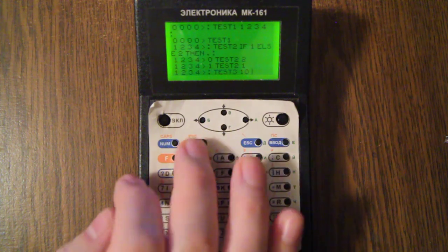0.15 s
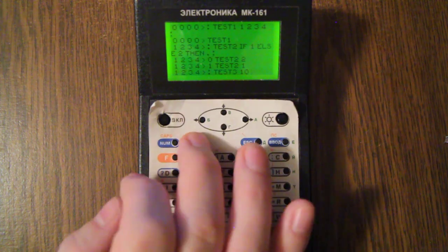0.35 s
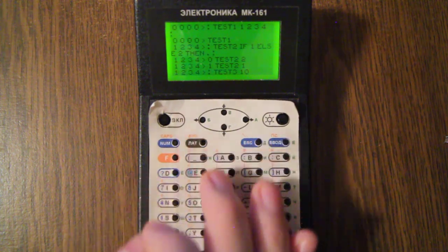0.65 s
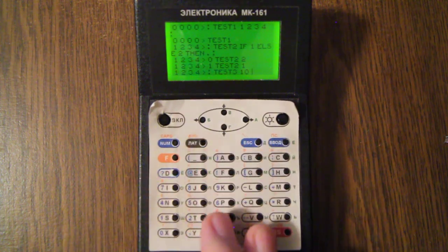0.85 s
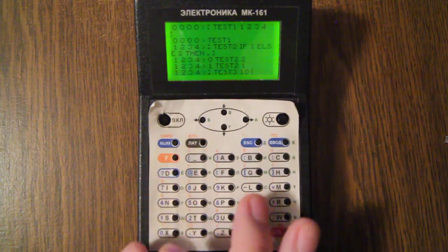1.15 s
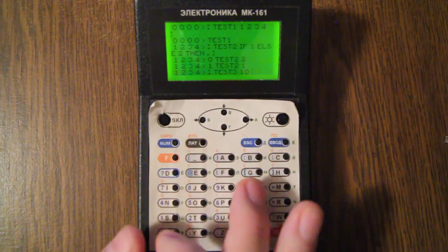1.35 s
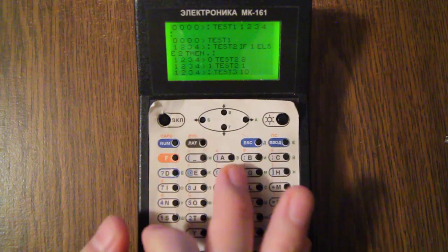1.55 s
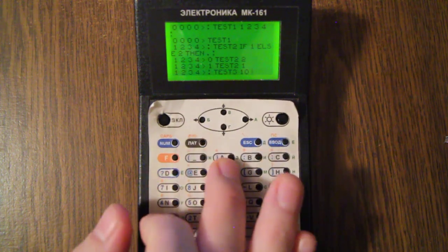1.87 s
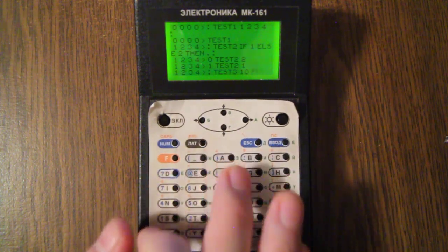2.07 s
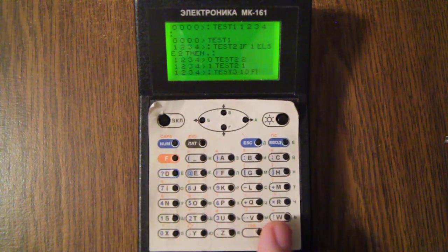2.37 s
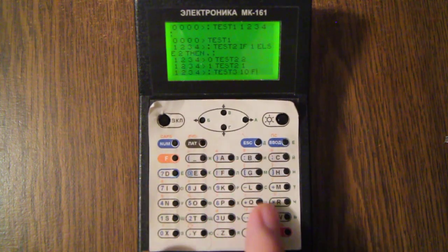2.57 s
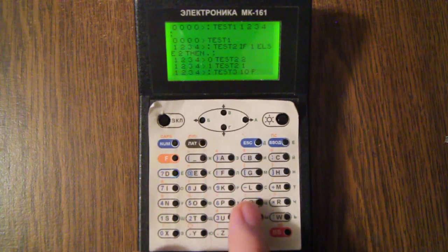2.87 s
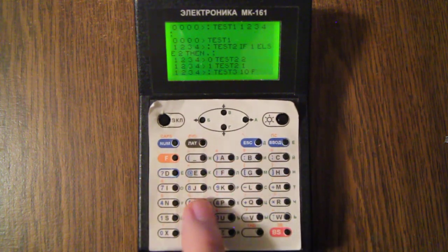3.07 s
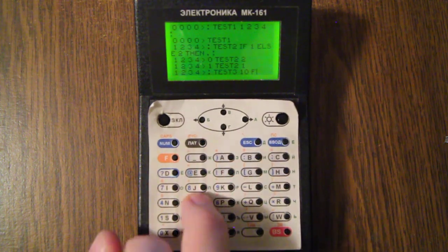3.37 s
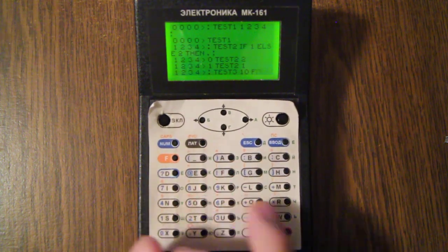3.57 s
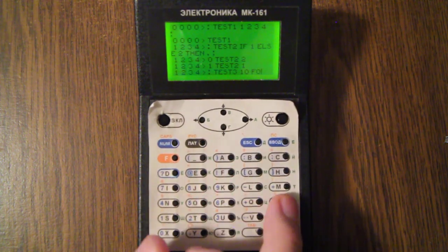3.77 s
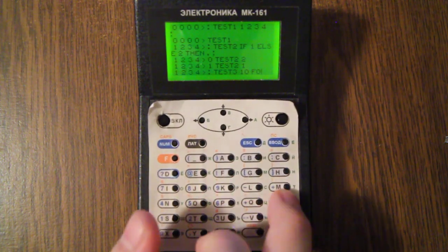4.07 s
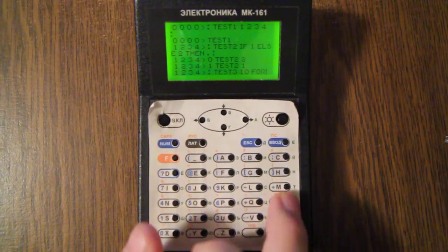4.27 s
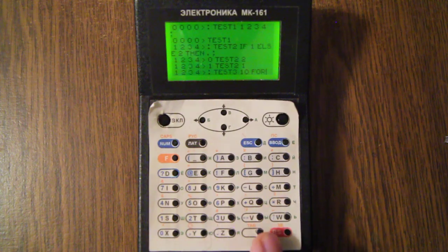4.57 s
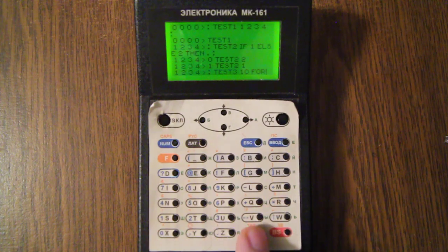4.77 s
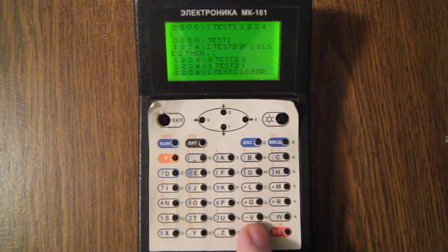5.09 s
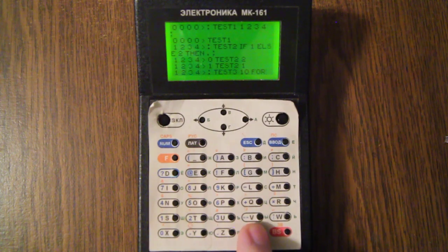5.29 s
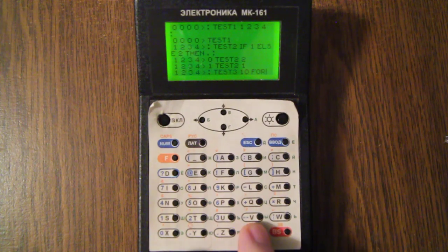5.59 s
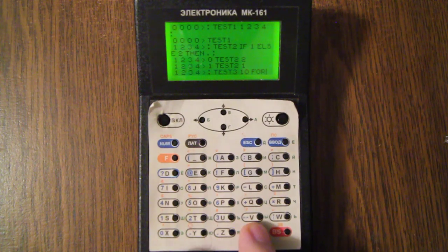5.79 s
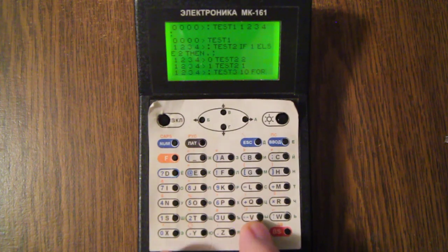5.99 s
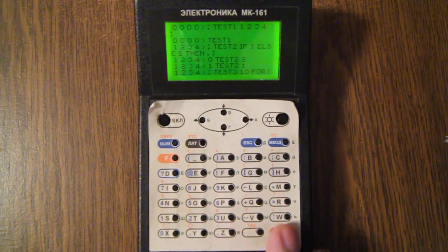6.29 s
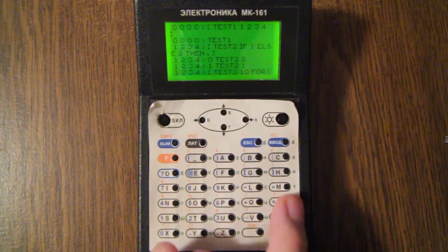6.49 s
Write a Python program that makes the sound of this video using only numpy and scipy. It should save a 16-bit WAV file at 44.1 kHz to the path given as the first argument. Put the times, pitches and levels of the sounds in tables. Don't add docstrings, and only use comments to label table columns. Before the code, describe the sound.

A finger presses small stiff keys on a hollow plastic calculator lying on a wooden desk. Sharp snaps with boxy knocks are followed by looser release rattles, three main press-release pairs early on, then a loud single press, softer taps, a lull and a light final cluster. A small fan whirrs steadily behind, with low rumble and hiss. Close microphone, small room with a brief response.

```python
import sys
import numpy as np
from scipy import signal
from scipy.fft import rfft, irfft
from scipy.io import wavfile

SR = 44100
rng = np.random.default_rng(int(sys.argv[2]) if len(sys.argv) > 2 else 0)


def voltage_ratio(decibels):
    exponent = np.asarray(decibels, float) / 20
    return 10 ** exponent


def to_wav(s):
    ch = np.atleast_2d(s).T
    pcm = np.round(np.clip(ch, -1, 1) * 32767)
    wavfile.write(sys.argv[1], SR, pcm.astype(np.int16))


N = 292824


def level(x, db):
    return x * voltage_ratio(db) / np.sqrt(np.mean(x ** 2))


def shaped(gain, count):
    hz = np.arange(count // 2 + 1) * SR / count + 1
    return irfft(rfft(rng.standard_normal(count)) * gain(hz), count)


def slope(points):
    hz, db = np.transpose(points)
    return lambda f: voltage_ratio(np.interp(np.log(f), np.log(hz), db))


def walk(rate_hz):
    wander = shaped(lambda f: 1 / (1 + (f / rate_hz) ** 2), N)
    return wander / wander.std()


def add(out, start_s, y):
    i = int(start_s * SR)
    out[i:i + len(y)] += y[:N - i]


def background():
    # pitch_hz [Hz], density_db [dB per Hz]
    hiss_curve = [(25, -41), (45, -4.5), (65, -2.5), (120, -2), (300, -8), (600, -10.5), (1000, -15),
                  (2000, -19.5), (4000, -18.5), (8000, -24.5), (12000, -29.5), (16000, -35.5)]
    # start_s [s], hold_s [s], level_db [dB]
    swells = [
        (0.0, 0.4, -52.5),
        (1.95, 0.38, -55),
        (3.35, 1.0, -47.5),
        (6.087, .4, -53.5),
    ]
    rise_db_s, fall_db_s = 73, 46
    hiss = level(shaped(slope(hiss_curve), N), -57.5)
    drone = level(shaped(lambda f: 1 / (1 + ((f - 225) / 35) ** 2), N), -11.5)
    t = np.arange(N) / SR
    swell = np.zeros(N)
    for start_s, hold_s, db in swells:
        early_s = np.maximum(start_s - t, 0)
        late_s = np.maximum(t - start_s - hold_s, 0)
        swell += voltage_ratio(db - rise_db_s * early_s - fall_db_s * late_s)
    return hiss + drone * swell


def fan():
    # pitch_hz [Hz], width_hz [Hz], level_db [dB]
    housing = [(754, 256, -8.5), (771, 47, -9), (1319, 435, -8), (1457, 360, 2), (1573, 217, -4.5),
               (1656, 220, -6), (2455, 610, -17.5), (3473, 510, -18.5)]
    # pitch_hz [Hz], wander_hz [Hz], level_db [dB]
    motor_tones = [(48, 1.55, -65), (201, 3.1, -76.5), (301.5, 3.05, -70.5), (770, 1.35, -62.5),
                   (1201, 2.48, -65.5), (1371, 4.04, -59.5), (1793, 3, -72)]
    flutter_db, gust_db, tone_sway_db = -1, 2.5, 2
    air, tones = np.zeros(N), np.zeros(N)
    for hz, width_hz, db in housing:
        band = shaped(lambda f: 1 / (1 + (2 * (f - hz) / width_hz) ** 2) ** 1.58, N)
        air += voltage_ratio(db + flutter_db * walk(1.6)) * band
    for hz, wander_hz, db in motor_tones:
        cycles = np.cumsum(hz + wander_hz * walk(3.94)) / SR
        tones += voltage_ratio(db + tone_sway_db * walk(2.2)) * np.sin(2 * np.pi * cycles)
    return level(air * voltage_ratio(gust_db * walk(68)), -49) + tones


def brushes():
    # middle_s [s], level_db [dB], length_ms [ms], pitch_hz [Hz]
    rubs = [
        (.87, -68, 30, 5500),
        (5.459, -65, 22, 3000),
        (6.30, -64.5, 32, 9700),
        (6.305, -68, 23, 14000),
    ]
    out, count = np.zeros(N), 4096
    ms = np.linspace(-0.5, 0.5, count) * count / SR * 1000
    for middle_s, db, length_ms, hz in rubs:
        rub = shaped(lambda f: 1 / (1 + ((f - hz) / (0.17 * hz)) ** 2), count)
        add(out, middle_s - count / 2 / SR, level(rub, db) * np.exp(-(ms / length_ms) ** 2))
    return out


def room(x):
    # pitch_hz [Hz], level_db [dB]
    reflections = [(200, 0.5), (700, -5.5), (1500, 6), (3000, -7.5), (5000, -3), (6500, -1), (8600, 0),
                   (11000, -4), (16000, -6)]
    t60_s, gap_ms = 0.19, 5.2
    t = np.arange(8192) / SR
    build = 1 - np.exp(-(t * 1000 / gap_ms) ** 2)
    tail = shaped(slope(reflections), len(t)) * 1000. ** (-t / t60_s) * build
    return signal.fftconvolve(x, tail * voltage_ratio(-11) / np.linalg.norm(tail))


def ring(modes, push, near_hz, favour_db, scatter_db, sustain):
    hz, db, t60_s = np.transpose(modes)
    level_chance, pitch_chance = rng.standard_normal((2, len(hz)))
    nearness = np.exp(-(np.log(hz / near_hz) / 0.18) ** 2)
    db = db + scatter_db * level_chance + favour_db * nearness
    t = np.arange(int(SR * t60_s.max() * sustain))[:, None] / SR
    side = (-1.) ** np.arange(len(hz))
    waves = np.sin(2 * np.pi * hz * (1 + 0.023 * pitch_chance) * t)
    body = waves * 1000. ** (-t / (t60_s * sustain)) @ (side * voltage_ratio(db))
    y = signal.fftconvolve(body, push)
    return y / np.abs(y).max()


def knocks():
    # start_s [s], peak_db [dB], pitch_hz [Hz], desk_thump_db [dB re peak], lid_db
    # [dB re peak]
    landings = [(0.3837, -25.5, 620, -16, -10), (0.546, -22, 513, -17.5, -13), (0.573, -55, 350, -25, -4),
                (0.927, -57, 357, -10, -9), (1.802, -26.5, 715, -15.5, -1.5), (2.045, -24, 510, -23, -5.5),
                (2.073, -32, 530, -24, -6), (3.312, -30.5, 745, -12, -5), (3.453, -41, 770, -4.5, -2),
                (3.499, -29, 522, -8, -9.5), (3.519, -37, 706, -8, -6), (3.993, -31.5, 730, -16, -3),
                (4.2792, -27, 740, -15, -5.5), (4.321, -49, 713, -21, 9), (5.897, -34.5, 650, -10, -12),
                (6.137, -32, 690, -8, -8), (6.185, -44.5, 729, -16, -4)]
    # pitch_hz [Hz], level_db [dB], t60_s [s]
    case_modes = [(358.5, -5.5, 0.16), (395.6, 1, 0.05), (517, 8, 0.027), (604, 6, 0.011),
                  (593, -2.5, 0.01), (704.3, -0.5, 0.089)]
    lid_modes = [(934, -0.5, 0.04), (1034, -1.5, 0.069), (1204, 8.5, 0.042), (1620, 3, 0.027)]
    desk_modes = [(111, -6, 0.22), (143, 0.5, 0.097), (219.8, -1.5, 0.15)]
    firm_db, firm_ring, ring_per_db = -35.5, 0.9, 0.5
    out, push = np.zeros(N), np.hanning(int(0.5 * SR / 1000))
    for s, db, hz, thump_db, lid_db in landings:
        sustain = firm_ring + ring_per_db * max(firm_db - db, 0)
        case = voltage_ratio(db) * ring(case_modes, push, hz, favour_db=5.5, scatter_db=2.5, sustain=sustain)
        case = signal.lfilter([1, -1], [1, -.988], case)
        lid = voltage_ratio(db + lid_db) * ring(lid_modes, push, hz, favour_db=0, scatter_db=1, sustain=1)
        desk = voltage_ratio(db + thump_db) * ring(desk_modes, push, hz, favour_db=0, scatter_db=2.5, sustain=1)
        add(out, s, case)
        add(out, s, lid)
        add(out, s, voltage_ratio(0.5) * room(case))
        add(out, s + 0.0031, desk)
    return out


def spray(rise_ms, chatter_ms):
    ms = np.arange(SR // 40) * 1000 / SR
    shape = (1 - np.exp(-ms / rise_ms)) * np.exp(-ms / chatter_ms)
    return rng.standard_normal((3, len(ms))) * rng.random(len(ms)) ** 2.56 * shape


def even(x, order=16):
    r = np.correlate(x, x, "full")[len(x) - 1:][:order + 1]
    lags = np.abs(np.subtract.outer(np.arange(order), np.arange(order)))
    predictor = np.linalg.solve(r[lags], r[1:])
    return signal.lfilter(np.r_[1, -predictor], 1, x)


def click(out, s, db, bright_db, hz, top_db, ticks):
    # pitch_hz [Hz], level_db [dB], t60_s [s]
    panel_modes = [(1900, -6, 0.023), (2360, 4.5, 0.015), (2700, 1.5, 0.028), (3230, 7.5, 0.01),
                   (3930, 4.5, 0.013), (4270, 10.5, 0.0038), (5120, -6.5, 0.031)]
    dome_modes = [(6020, 2.5, 0.0047), (6750, -3, 0.0078), (6520, 4.5, 0.008), (8500, 0.5, 0.0054),
                  (8820, -4, 0.011)]
    edge_modes = [(9660, 2, 0.0024), (11000, -1.5, 0.0039), (12700, -0.5, 0.0022), (14700, -5.5, 0.0011)]
    soft_below_db, soft_roll_off = -8.5, 0.61
    tilt = soft_roll_off * min(bright_db - soft_below_db, 0)
    parts = (panel_modes, db), (dome_modes, db + bright_db), (edge_modes, db + top_db)
    for (part_modes, part_db), tick in zip(parts, ticks):
        modes = [(f, g + tilt * max(np.log2(f / hz), 0), t60_s) for f, g, t60_s in part_modes]
        direct = voltage_ratio(part_db) * ring(modes, even(tick), hz, favour_db=8.0, scatter_db=3.5, sustain=0.91)
        blurred = ring(modes, [1.], hz, favour_db=3.0, scatter_db=1, sustain=.45)
        blurred = blurred * np.linalg.norm(direct) / np.linalg.norm(blurred)
        add(out, s, direct)
        add(out, s, room(blurred))


def releases():
    # start_s [s], slip_after_ms [ms], rebound_after_ms [ms], landing_db [dB], growth_db [dB per stage]
    let_go = [
        (0.5468, 11, 24.5, -36.5, -0.8),
        (2.0438, 12.8, 30, -33, 5),
        (3.496, 13.4, 24.6, -38, 6),
    ]
    # bright_db [dB re peak], pitch_hz [Hz], chatter_ms [ms]
    stages = [
        (-18, 2360, 6.2),
        (-11, 3860, 3.3),
        (-11.5, 3800, 1.56),
    ]
    rattles = []
    for s, slip_ms, rebound_ms, db, growth_db in let_go:
        for k, ms in enumerate((0, slip_ms, rebound_ms)):
            rattles.append((s + ms / 1000, db + k * growth_db, *stages[k]))
    return rattles


def keys():
    # start_s [s], peak_db [dB], bright_db [dB re peak], pitch_hz [Hz], top_db [dB re peak]
    snaps = [
        (0.3829, -19, -11.5, 3060, -25),
        (1.8017, -18, 2, 3200, -23),
        (3.3098, -19.5, -0.5, 3900, -17),
        (3.9896, -16, -4.5, 4540, -15.5),
        (5.895, -28.5, -12, 3440, -11),
    ]
    # start_s [s], peak_db [dB], bright_db [dB re peak], pitch_hz [Hz], chatter_ms [ms]
    lone_rattles = [(0.1371, -48, -20, 2410, 2.5), (0.2289, -29.5, -11.5, 3340, 3.1),
                    (0.3344, -60, -13, 2570, 2.3), (2.616, -36.5, -14, 4500, 1.5),
                    (3.4545, -46, -15, 2290, 2.7), (3.7604, -38, -14, 3760, 4.1),
                    (4.2772, -26.5, -19, 2600, 5.3), (4.3141, -39, -18, 2390, 3),
                    (4.319, -42, -23, 2720, 2.3), (4.4462, -37, -6.5, 3220, 3),
                    (4.554, -53, -16, 3350, 2.3), (4.8627, -36, -27, 3220, 1.4),
                    (6.139, -37.5, -7.5, 2860, 7), (6.1616, -46, -1, 2290, 2.3),
                    (6.1734, -45, -17, 2700, 2.5), (6.1847, -37.5, -12, 3230, 1.5),
                    (6.229, -46, -11, 3230, 2.8), (6.554, -37.5, -10.5, 3870, 2.9)]
    bounce_ms, bounce_db = 1.7, -7.5
    out = np.zeros(N)
    for s, db, bright_db, hz, top_db in snaps:
        chatter_ms = 3.27 + 0.07 * bright_db
        ticks = voltage_ratio(-7.5) * spray(0.11, chatter_ms)
        ticks[:, 0] = 1
        ticks[:, int(bounce_ms * SR / 1000)] += voltage_ratio(bounce_db)
        click(out, s + .0008, db, bright_db, hz, top_db, ticks)
    for s, db, bright_db, hz, chatter_ms in sorted(list(lone_rattles) + releases()):
        edge_db = -13 + 0.49 * bright_db
        click(out, s, db, bright_db, hz, edge_db, spray(2.0, chatter_ms))
    return out


def scene():
    return (background() + fan() + brushes() + knocks() + keys())[None]


def top_cut(x):
    return signal.sosfilt(signal.butter(12, 16460, fs=SR, output="sos"), x)


def record(dry):
    bass = signal.butter(2, 42, "high", fs=SR, output="sos")
    top = signal.ellip(10, .1, 60, 15720, fs=SR, output="sos")
    return top_cut(signal.sosfilt(np.vstack([bass, top]), dry))


dry = scene()
out = record(dry)
to_wav(out)
```